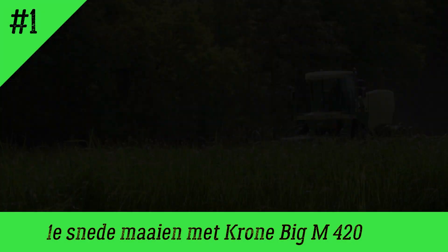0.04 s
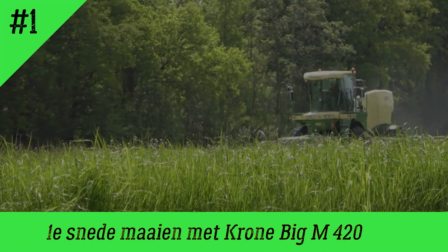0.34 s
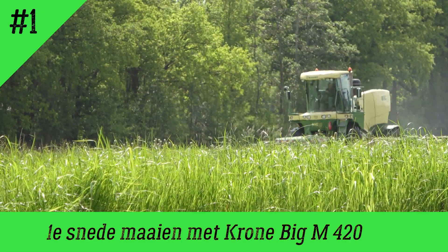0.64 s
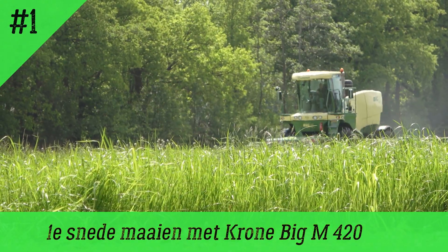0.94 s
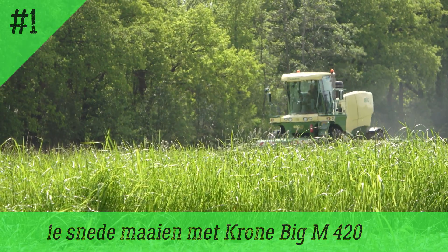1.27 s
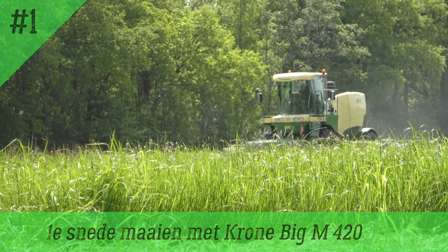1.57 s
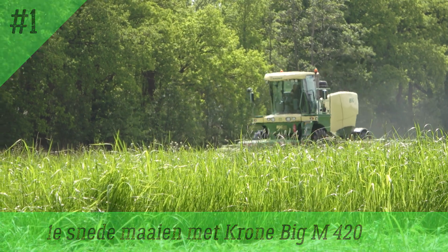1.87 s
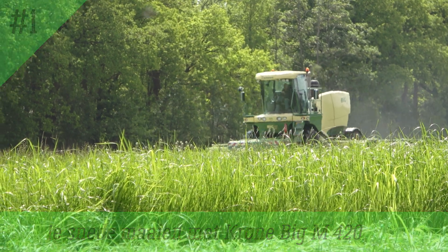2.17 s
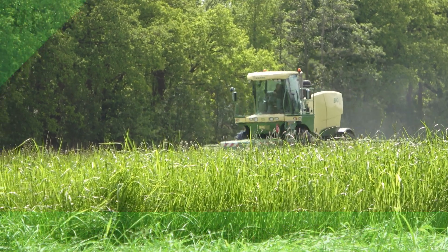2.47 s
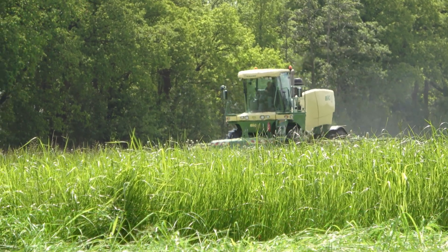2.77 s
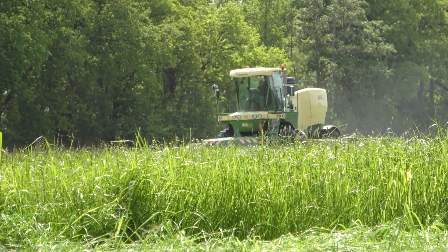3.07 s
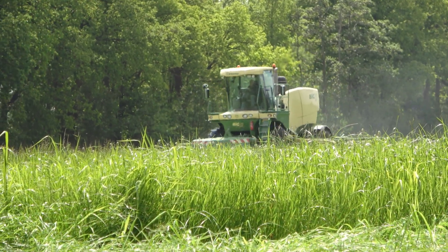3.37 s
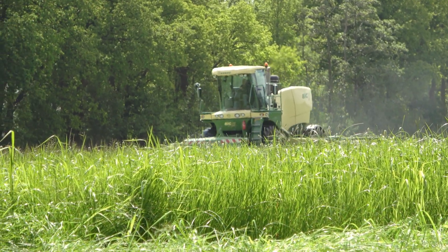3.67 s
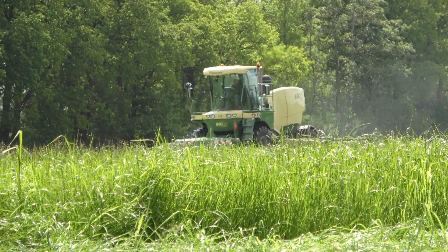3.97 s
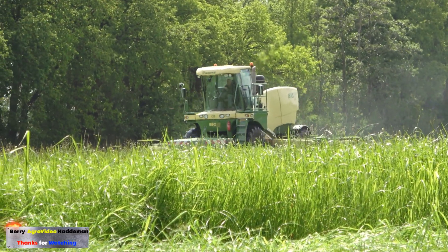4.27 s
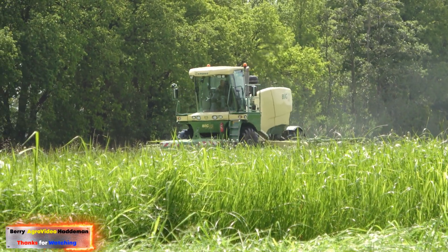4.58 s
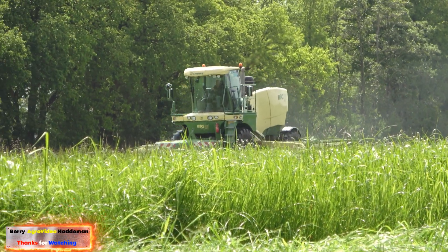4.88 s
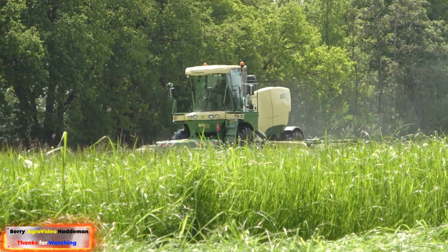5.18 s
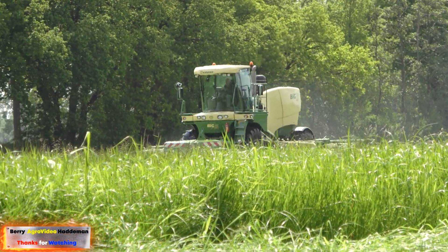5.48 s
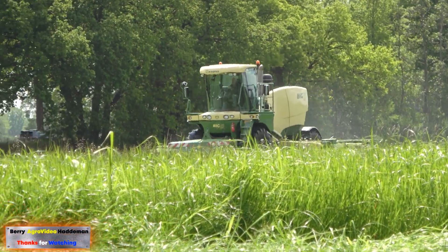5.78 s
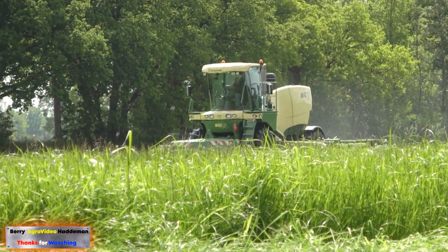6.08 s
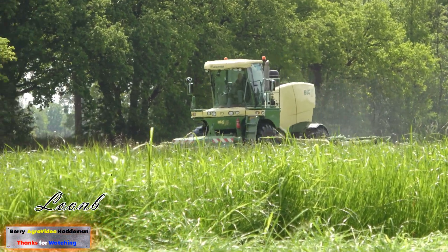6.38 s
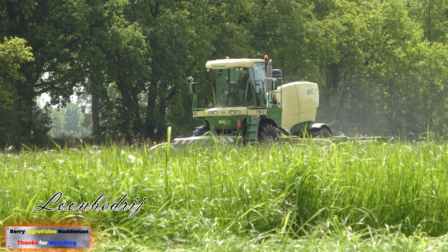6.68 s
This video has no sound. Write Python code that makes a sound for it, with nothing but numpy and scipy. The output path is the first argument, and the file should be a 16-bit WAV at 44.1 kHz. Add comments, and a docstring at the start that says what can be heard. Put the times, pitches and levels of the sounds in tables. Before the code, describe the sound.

Heard from the edge of a field, a diesel mower draws nearer, starting moderately soft and building to a steady, pulsing hum. Rumble, the hiss of cut stems and a wavering gear whine ride along with the engine and blade drone. A light breeze murmurs on the microphone, faint birds whistle and trill at the start and near the end, and one small dry tick sounds close by late on.

```python
"""A self-propelled disc mower cuts a grass field at the edge of a wood; its sound fades up over about
four seconds, then holds. Its six-cylinder diesel fires and its blades chop the air at nearly the same
pitch, so the two drones throb against each other, over a rumble, the rush of cut grass and a gear whine.
Small birds call faintly from the trees, light air stirs, and one dry tick sounds close by."""
import sys
import numpy as np
from scipy import signal
from scipy.fft import rfft, irfft, next_fast_len
from scipy.io import wavfile

SR = 44100
rng = np.random.default_rng(int(sys.argv[2]) if len(sys.argv) > 2 else 0)


def dump_mix(stems):
    """Bounce the given channels to the path in sys.argv[1] as a 16-bit WAV at rate SR."""
    frames = np.atleast_2d(stems).T  # one column per channel
    limited = np.clip(frames, -1, 1)  # hard clip at full scale
    pcm = np.round(limited * 32767).astype(np.int16)
    wavfile.write(sys.argv[1], SR, pcm)


N = 296793
TIME = np.arange(N) / SR

# How alike the two ears are. Each row: pitch in Hz, likeness (1 is the same, 0 is unrelated).
EAR_LIKENESS = [(25, .8), (60, .8), (95, .96), (180, .96), (350, .62), (600, .62), (1200, .75), (2000, .25),
                (4000, .02), (8000, -.08), (14000, -.15)]
# Which ear is louder. Each row: pitch in Hz, left minus right in dB.
EAR_BALANCE = [(25, 2.5), (60, 2.8), (100, 3.8), (140, 3), (200, 3.5), (330, .5), (600, -1.5), (1200, 0),
               (4000, .4), (8000, 1.3), (14000, .3)]
# The colours of five noises. Each row: pitch in Hz, relative strength in dB.
BREEZE_COLOUR = [(10, -3), (25, 0), (35, 1), (55, 1), (90, -20)]
RUMBLE_COLOUR = [(20, -44), (42, -37), (52, -5), (75, -6.5), (100, 5.5), (125, -9.5), (145, 0.5), (180, 2),
                 (210, 2.5), (240, -12.5), (280, -26.5), (400, -34)]
RUSH_COLOUR = [(150, 2), (300, -6), (450, -4), (600, -3), (720, -1.5), (900, -1), (1050, 2), (1300, 0.5),
               (1500, -2.5), (1900, -7.5), (2500, -15), (4000, -34.5)]
HISS_COLOUR = [(1200, -4), (2300, 2), (3000, 0), (4200, -0.5), (5500, -5.5), (8000, -10), (10000, -19.5),
               (13000, -26), (16000, -27)]
SPRAY_COLOUR = [(3000, -17), (8000, -4), (10000, -1), (16000, -0.5)]
# Bird whistles. Each row: start and length in seconds, top pitch in Hz, level in dB,
# share heard directly from 0 to 1.
WHISTLES = [(0.058, 0.083, 2740, -58, .7), (.51, 0.065, 2480, -54, .5), (0.699, 0.21, 4200, -54, 0.16),
            (6.494, .035, 4080, -46, .6), (6.618, 0.14, 2660, -40, 0.97), (6.658, 0.029, 4020, -44, 0.6)]
# Trills deep in the wood. Each row: start and length in seconds, the pitches in Hz that
# each note falls from and to, peak level in dB.
TRILLS = [(0.36, 0.12, 7600, 4700, -60), (1.15, 0.12, 8400, 7100, -64), (5.919, 0.67, 5750, 3950, -46)]
# A dry tick. Each row: time in seconds, level before filtering in dB.
TICKS = [(5.667, -39)]
# The mower's sound fades up, then holds. Each row: time in seconds, rush level in dB,
# base level for hiss and snaps in dB.
LOUDNESS_RISE = [(0.06, -47.5, -57), (0.3, -47, -55.5), (0.76, -44.5, -54), (2.15, -40.5, -50.5),
                 (3.48, -37, -46.5), (4.5, -35.5, -45), (4.74, -36, -45), (5.65, -36, -44.5),
                 (6.33, -35.5, -43.5), (6.7, -35.5, -43.5)]
# The engine sags under load and recovers. Each row: time in seconds, crankshaft turns per second.
ENGINE_SPEED = [(0.0, 33.64), (0.34, 33.69), (0.67, 33.49), (1.68, 33.49), (2.36, 33.77), (3.03, 33.75),
                (4.04, 34.12), (6.73, 34.19)]
# The exhaust note. Each row: multiple of the crank speed, level once faded up in dB, how strongly it
# follows the rise, extra dB when the engine faces the listener.
EXHAUST_TONES = [(3, -27.5, 0.88, 1.5), (6, -31.5, 1.47, -1.2)]
# Lesser tones of the engine and of the disc drive. Each row: multiple of the crank or disc speed,
# level once faded up in dB, how fast it wavers in Hz.
ENGINE_TONES = [(2.5, -54, 1.5), (3.5, -37, 1.2), (4, -35.5, 0.2), (4.5, -39.5, 0.53), (5, -44, 1.2),
                (7, -53.5, 3.5), (10, -55.5, 2.4), (12, -51, 2.66), (20, -58, 3.1), (24, -52, 2.8),
                (29.5, -58, 5.4), (30, -54.5, 2.5), (39.74, -50.5, 4.8), (48.2, -55, 5.4),
                (71.8, -55.5, 23), (96.3, -58.5, 24), (118.5, -65, 23)]
DRIVE_TONES = [(1, -67, 1.1), (1.915, -38.5, 0.37), (3.04, -37.5, 1.25), (5.01, -53, 1.2),
               (8.02, -54.5, 2.35), (9.91, -54, 1.6), (12.03, -58, 1), (13.83, -59, 1.9),
               (16.15, -55.5, 2.5), (18.03, -57, 2.1), (20.96, -49.5, 3.8), (25.72, -57, 1.6)]
# Two mower decks differ in speed. Each row: time in seconds, difference in disc turns per second.
DECK_SLIP = [(0.0, 0.022), (1.9, 0.069), (2.9, 0.19), (6.73, 0.15)]
# The blade drone. Each row: multiple of the disc speed, level once faded up in dB, how strongly it
# follows the rise, strength of the second deck (minus means it opposes the first when they line up).
BLADE_TONES = [(2, -36.5, 0.94, 0.83), (4, -27, 0.8, -0.8)]


def from_db(db):
    """Turn decibels into a gain."""
    return 10 ** (np.asarray(db) / 20)


def rms_one(x):
    """Scale to an average level (rms) of 1."""
    return x / np.sqrt(np.mean(x ** 2) + 1e-20)


def in_time(rows):
    """Read each column of a time table at every sample."""
    times, *columns = np.transpose(rows)
    return [np.interp(TIME, times, column) for column in columns]


def at_hz(rows, hz):
    """Read a pitch table, giving each octave equal room."""
    pitches, values = np.transpose(rows)
    return np.interp(np.log(np.maximum(hz, 1)), np.log(pitches), values)


def drift(rate_hz):
    """A smooth random wander, about 1 in size."""
    keep = np.exp(-200 * np.pi * rate_hz / SR)
    noise = rng.standard_normal(N // 100 + 2002)
    slow = signal.lfilter([1], [1, -2 * keep, keep * keep], noise)[2000:]
    return np.interp(np.arange(N) / 100, np.arange(len(slow)), rms_one(slow))


def ear_gains(hz):
    """Left and right gains at these pitches."""
    return from_db(np.array([[1], [-1]]) * at_hz(EAR_BALANCE, hz) / 2)


def airborne(noises, colour):
    """Two unrelated noises become coloured stereo sound, less alike towards the treble."""
    size = next_fast_len(N)
    hz = np.arange(size // 2 + 1) * SR / size
    roll_off = 1 + (hz / colour[-1][0] / 2) ** 4
    mid, side = rfft(noises, size) * from_db(at_hz(colour, hz)) / roll_off
    alike = at_hz(EAR_LIKENESS, hz)
    spectra = np.sqrt(1 + alike) * mid + np.sqrt(1 - alike) * side * [[1], [-1]]
    pair = irfft(spectra * ear_gains(hz), size)[:, :N]
    return pair / np.sqrt(np.mean(pair.mean(0) ** 2))


def churn(colour, turns, pulsing, flutter_db, flutter_hz):
    """Swirling air swells with each stroke of a shaft and flutters by chance."""
    swell = (1 + pulsing * np.cos(2 * np.pi * turns)) * from_db(flutter_db * drift(flutter_hz))
    return airborne(rng.standard_normal((2, N)) * swell, colour)


def tone(turns, multiple):
    """A clean tone at a multiple of a shaft's speed."""
    hz = multiple * turns[-1] / TIME[-1]
    return np.sqrt(2) * np.sin(2 * np.pi * (multiple * turns + rng.random())) * ear_gains(hz)


def fading_tone(turns, multiple, fade_hz, steady):
    """A tone arrives directly (the steady share) and by shifting paths over the field."""
    hz = multiple * turns[-1] / TIME[-1]
    angle = 2 * np.pi * (multiple * turns + rng.random())
    stray = np.sqrt(1 - steady)
    mid = (np.sqrt(2 * steady) + stray * drift(fade_hz)) * np.sin(angle)
    mid += stray * drift(fade_hz) * np.cos(angle)
    alike = np.clip(at_hz(EAR_LIKENESS, hz), 0, 1)
    side = np.sqrt((1 - alike) / (1 + alike)) * drift(fade_hz) * np.cos(angle)
    return (mid + side * [[1], [-1]]) * ear_gains(hz)


def beat(cycles, second):
    """Two like tones swell and fade as they slip in and out of step; the second is weaker."""
    return np.abs(1 + second * np.exp(2j * np.pi * cycles)) / np.sqrt(1 + second ** 2)


def breeze(level_db):
    """Light air brushes the microphone with a low murmur."""
    return from_db(level_db / 2 - 60) * airborne(rng.standard_normal((2, N)), BREEZE_COLOUR)


def wood(sound, ring_s):
    """Countless trunks scatter a sound into a smooth tail, a different one at each ear."""
    tail = rng.standard_normal((2, SR)) * from_db(-60 * TIME[:SR] / ring_s)
    tail /= np.sqrt(np.sum(tail ** 2, axis=1, keepdims=True))
    return signal.fftconvolve(sound[None], tail, axes=1)[:, :N]


def bird_note(start, length, pitch):
    """One note opens and closes softly; pitch gives Hz from the share of the note gone by."""
    gone, note = (TIME - start) / length, np.zeros(N)
    on = (gone > 0) & (gone < 1)
    swell = np.sqrt(2 * np.sin(np.pi * gone[on]))
    note[on] = swell * np.sin(2 * np.pi * np.cumsum(pitch(gone)[on]) / SR)
    return note


def birds(trill_step_s=0.078, trill_note_s=0.085):
    """Whistles and trills; the deeper in the wood a bird sits, the more its call is scattered."""
    direct, scattered = np.zeros(N), np.zeros(N)
    waver = 1 + 0.009 * drift(59)
    for start, length, top_hz, db, share in WHISTLES:
        def arch(gone):
            """The pitch rises, tops out just past the middle and falls."""
            from_top_s = (np.clip(gone, 0, 1) - 0.55) * length
            return waver * top_hz * 2 ** (-36 * from_top_s ** 2)
        note = from_db(db) * bird_note(start, length, arch)
        direct += np.sqrt(share) * note
        scattered += np.sqrt(1 - share) * note
    for start, length, from_hz, to_hz, peak_db in TRILLS:
        def fall(gone):
            """The pitch slides down."""
            return waver * (from_hz + (to_hz - from_hz) * gone)
        for since in np.arange(0, length, trill_step_s):
            db = peak_db - 36 * (since - 0.57 * length) ** 2  # the trill swells, then fades
            scattered += from_db(db) * bird_note(start + since, trill_note_s, fall)
    return direct + wood(scattered, ring_s=0.48)


def tick(width_s=0.0007):
    """A very short, bright burst, strongest near its lowest pitches."""
    shape = sum(from_db(db) * np.exp(-((TIME - s) / width_s) ** 2 / 2) for s, db in TICKS)
    burst = shape * rng.standard_normal(N) + 1e-18
    ring = signal.lfilter(*signal.iirpeak(8700, 8, fs=SR), burst)
    treble_only = signal.butter(8, 8200, "high", fs=SR, output="sos")
    return signal.sosfilt(treble_only, 1.5 * burst + 4 * ring)


def rumble(disc, level_db, facing):
    """Low swirling air pulses with each turn of the discs."""
    gain = from_db(1.02 * level_db + 1.6 * facing - 33)
    return gain * churn(RUMBLE_COLOUR, disc, pulsing=0.097, flutter_db=0.5, flutter_hz=12)


def stalks(per_s, spread_db):
    """Stems snap at random, most of them softly."""
    sizes = from_db(spread_db * np.minimum(rng.exponential(1, (2, N)), 4))
    signs = rng.choice([-1, 1], (2, N))
    snapping = rng.random((2, N)) < per_s / SR
    return airborne(sizes * signs * snapping, HISS_COLOUR)


def cut_grass(crank, disc, rush_db, hiss_db, level_db):
    """Cutting makes a rush, a hiss, a fine spray of clippings and snapping stems."""
    rush = churn(RUSH_COLOUR, 2 * disc, pulsing=0.038, flutter_db=0.42, flutter_hz=11)
    hiss = churn(HISS_COLOUR, crank, pulsing=0.02, flutter_db=0.52, flutter_hz=12)
    spray = churn(SPRAY_COLOUR, crank, pulsing=0.02, flutter_db=0, flutter_hz=14)
    snaps = stalks(per_s=1400, spread_db=2)
    return (from_db(rush_db) * rush + from_db(hiss_db + 2) * hiss
            + from_db(0.97 * level_db - 56.5) * spray + from_db(hiss_db - 15.5) * snaps)


def gear_whine(crank, level_db, facing, teeth_per_turn=36.08, crest_s=5.05):
    """Meshing teeth whine; the tone beats with its own echo, ever more slowly."""
    since = TIME - crest_s
    cycles = 1.795 * since - 0.405 * since ** 2 / 2  # 1.795 beats a second at the crest
    gain = from_db(1.5 * level_db + 6.5 * facing - 47.5) * beat(cycles, second=0.57)
    return gain * fading_tone(crank, teeth_per_turn, fade_hz=3.9, steady=0.94)


def engine(crank, level_db, facing):
    """Three firings a turn give the exhaust note; lesser wavering tones and thin high whines join it."""
    exhaust = sum(from_db(db + follows * level_db + extra_db * facing) * tone(crank, multiple)
                  for multiple, db, follows, extra_db in EXHAUST_TONES)
    lesser = sum(from_db(db) * fading_tone(crank, round(2 * multiple) / 2, fade_hz, steady=0.54)
                 for multiple, db, fade_hz in ENGINE_TONES)
    return exhaust + from_db(1.08 * level_db) * lesser


def discs(disc, level_db, lined_up_s=4.167):
    """Two blades a disc chop the air; the drone swells and fades as the decks slip out of step."""
    slip = np.cumsum(in_time(DECK_SLIP)[0]) / SR
    slip -= np.interp(lined_up_s, TIME, slip)
    drone = sum(from_db(db + follows * level_db) * beat(multiple * slip, second) * tone(disc, multiple)
                for multiple, db, follows, second in BLADE_TONES)
    drive = sum(from_db(db) * fading_tone(disc, multiple, fade_hz, steady=0.34)
                for multiple, db, fade_hz in DRIVE_TONES)
    return drone + from_db(0.98 * level_db) * drive


def scene():
    """The crankshaft drives the whole mower, whose sound fades up and then holds."""
    crank = np.cumsum(in_time(ENGINE_SPEED)[0]) / SR  # turns made so far
    disc = 1.42341 * crank  # geared so the blades chop a few Hz below the firing rate
    rush_db, hiss_db = in_time(LOUDNESS_RISE)
    level_db = rush_db - np.percentile(rush_db, 75)  # about 0 once faded up
    facing = 1 / (1 + ((TIME - 5.0) / 0.99) ** 4)  # the engine side faces us from about 4 to 6 seconds
    noise = rumble(disc, level_db, facing) + cut_grass(crank, disc, rush_db, hiss_db, level_db)
    air = breeze(level_db)
    tones = engine(crank, level_db, facing) + gear_whine(crank, level_db, facing) + discs(disc, level_db)
    return air + birds() + tick() + noise + tones


def record(dry, start_s=0.035, cutoff_hz=15800):
    """The sound sets in after a moment of silence; the highest treble is cut steeply."""
    opened = dry * np.clip((TIME - start_s) / 0.002, 0, 1)
    return signal.sosfilt(signal.ellip(12, 0.1, 90, cutoff_hz, fs=SR, output="sos"), opened)


dry = scene()
out = record(dry)
dump_mix(out)
```